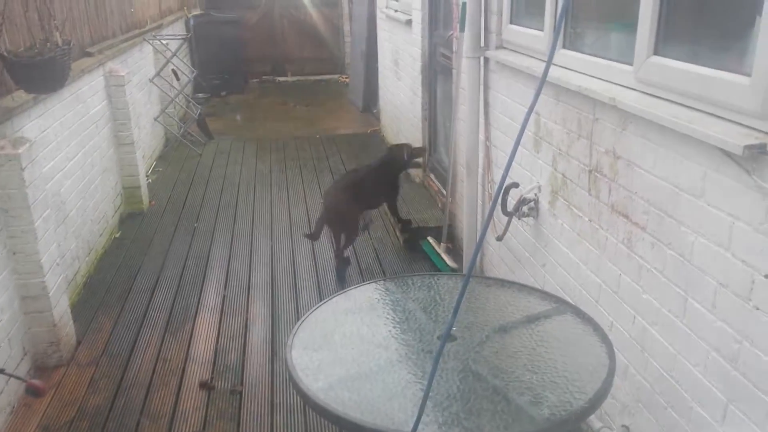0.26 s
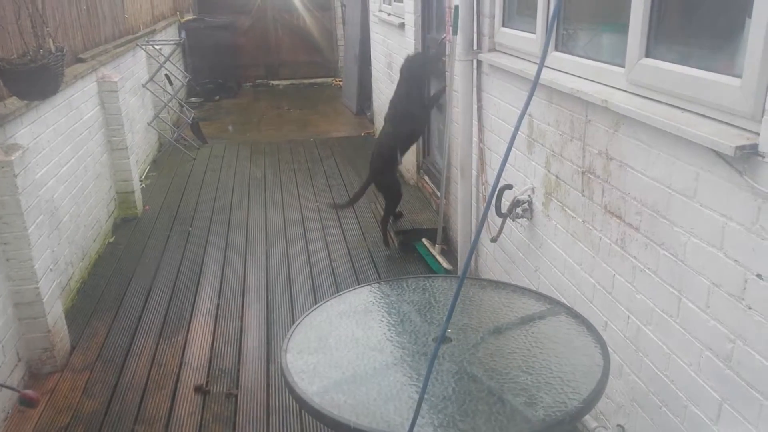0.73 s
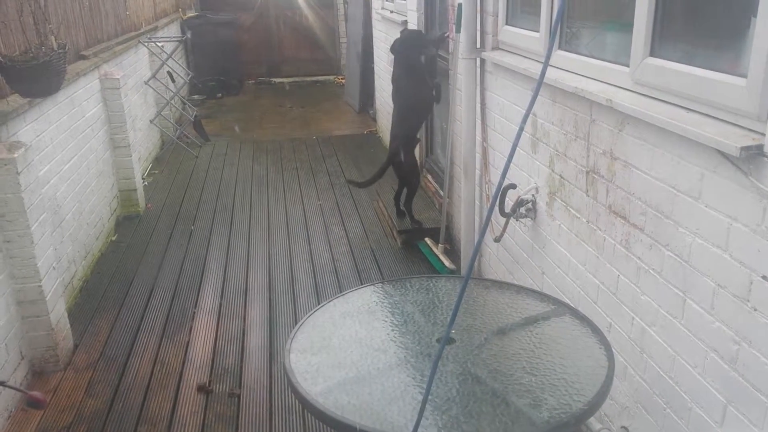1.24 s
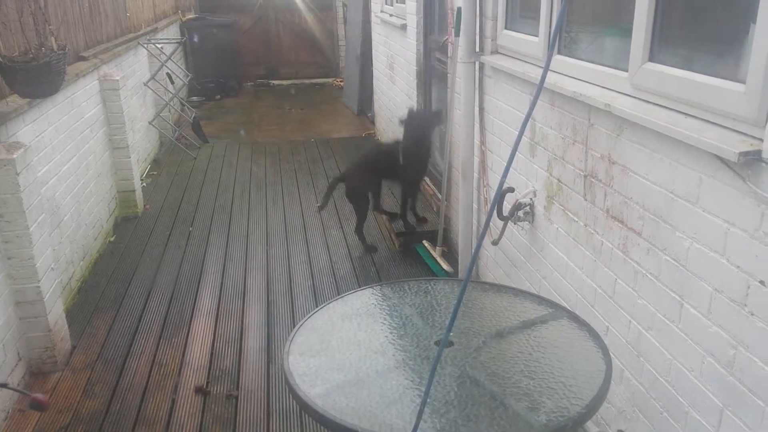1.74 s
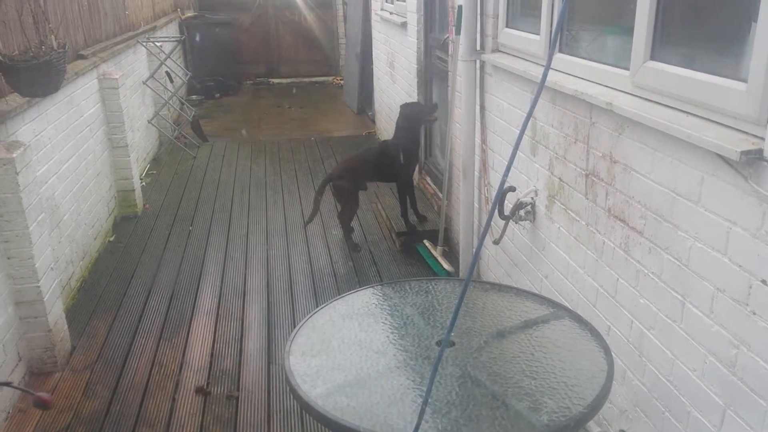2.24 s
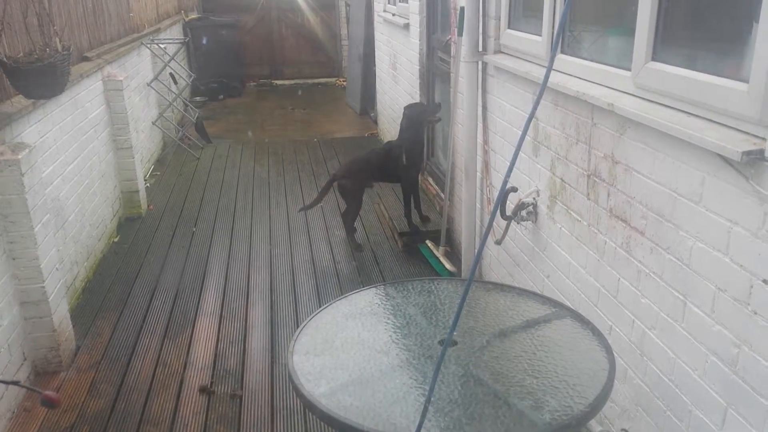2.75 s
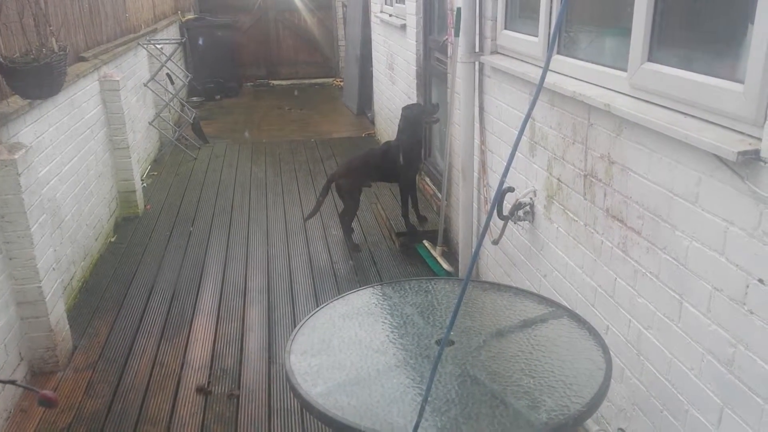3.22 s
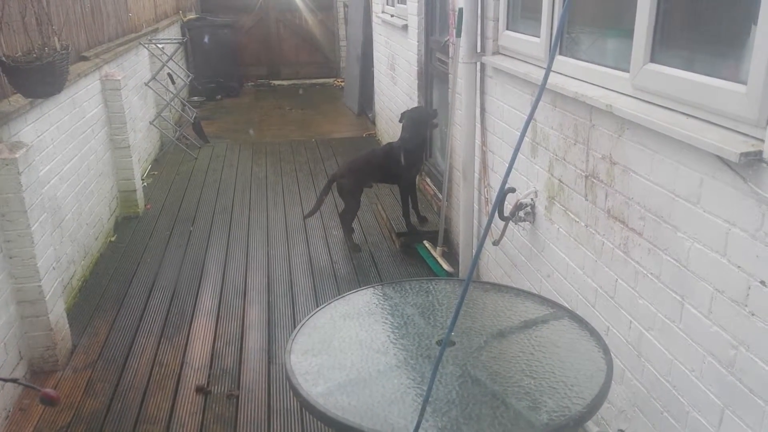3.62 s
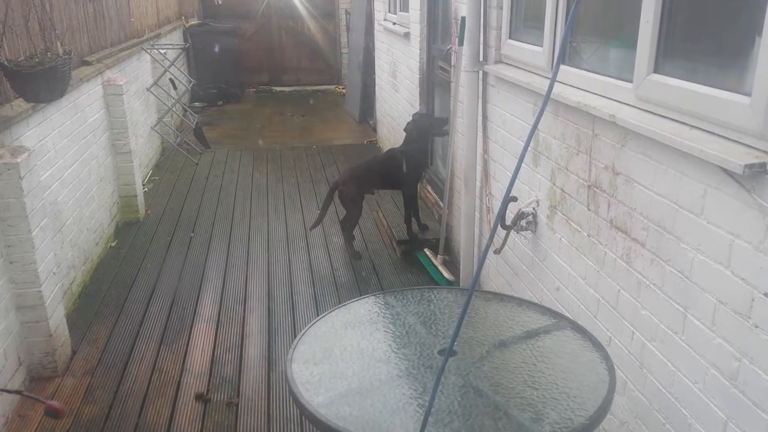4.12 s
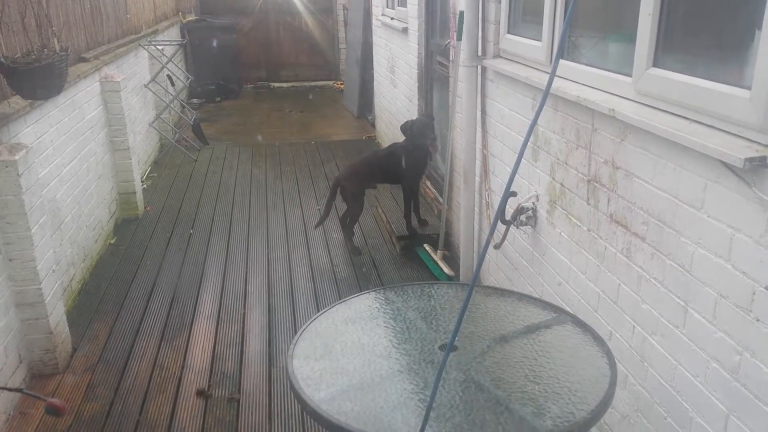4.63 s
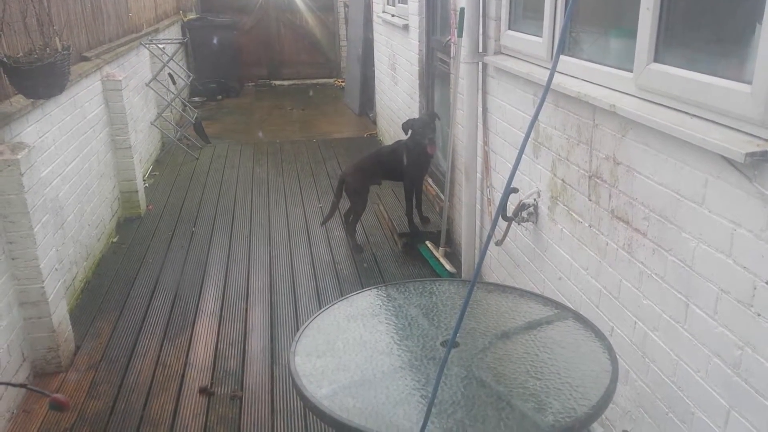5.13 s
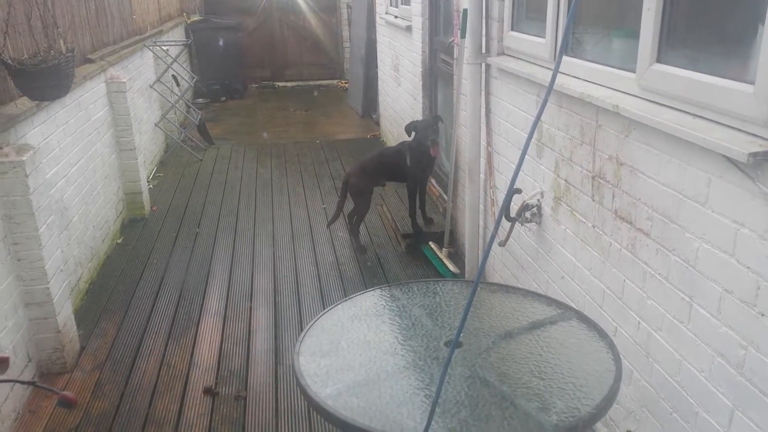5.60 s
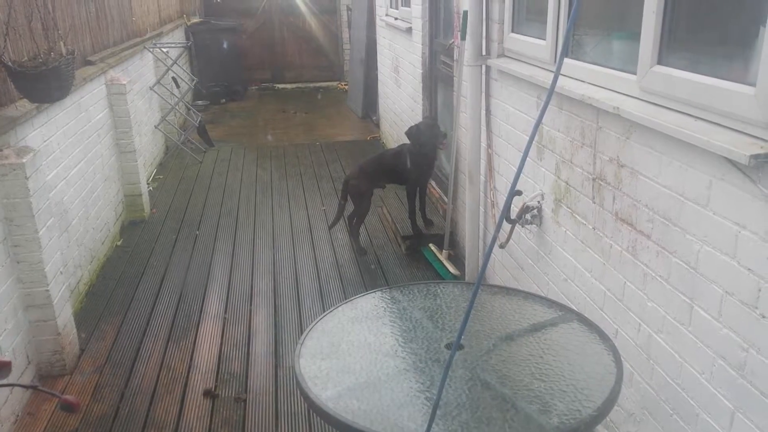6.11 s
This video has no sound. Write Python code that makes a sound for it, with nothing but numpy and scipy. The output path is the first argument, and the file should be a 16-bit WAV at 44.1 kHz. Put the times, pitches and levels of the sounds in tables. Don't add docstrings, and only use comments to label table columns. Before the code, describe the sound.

Sharp claw knocks, short scrapes and paw thuds on wood in a narrow yard, a brief metal dish clank, and a closing collar rattle.

```python
import sys
import numpy as np
from scipy import signal
from scipy.fft import rfft, irfft, next_fast_len
from scipy.io import wavfile
from scipy.ndimage import uniform_filter1d

SR = 44100
rng = np.random.default_rng(int(sys.argv[2]) if len(sys.argv) > 2 else 0)


def volts(x):
    e = np.asarray(x, float) / 20
    return 10 ** e


def put_to_file(sound):
    columns = np.atleast_2d(sound).T
    safe = np.clip(columns, -1, 1)
    whole_steps = np.round(safe * 32767)
    wavfile.write(sys.argv[1], SR, whole_steps.astype(np.int16))


N = 280343


def slips(size, per_s, spread_db):
    chance, sign, height = rng.random((size, 3)).T
    ticks = (chance < per_s / SR) * np.sign(sign - .5)
    return evened(ticks * volts(-spread_db * np.log(height + 0.00022)))


# start in seconds, knock level in dB,
# scrape level in dB over the knock, stroke length in seconds, knock pitch in Hz.
DOOR = [(0.12, -37, -30, 0.034, 503), (0.38, -35, -9.5, 0.027, 1130), (0.479, -26.5, -24, 0.0063, 1130),
        (0.531, -44, -6, 0.035, 1280), (0.788, -35.5, -29, 0.023, 565), (1.156, -28.5, -6, 0.022, 774),
        (1.416, -30.5, -32, 0.05, 850), (1.457, -40.5, -1, 0.03, 630), (1.528, -29, -8.5, 0.0066, 1360),
        (2.066, -50.5, 3, 0.012, 452), (3.469, -42, -16, 0.022, 541), (3.711, -31, -14.5, 0.0086, 1470),
        (4.441, -43, -20, 0.071, 920), (4.769, -35, -18, 0.073, 745), (5.614, -50, 14, 0.0088, 1230),
        (5.772, -29, -27.5, 0.014, 800)]
BOARDS = [(0.001, -55, 3, 0.014, 487), (0.268, -23, -21, 0.015, 710), (0.937, -29.5, -9, 0.0053, 514),
          (1.088, -46, -4.5, 0.039, 624), (1.383, -16.5, -16, 0.012, 705), (2.194, -41.5, 3.5, 0.018, 598),
          (2.215, -41.5, -3, 0.027, 471), (2.418, -25.5, -21, 0.0058, 764), (2.673, -25, -1.5, 0.016, 1600),
          (3.126, -21.5, -16, 0.033, 1240), (3.366, -30.5, -11, 0.0057, 463),
          (3.814, -28.5, -5.5, 0.0089, 506), (3.997, -30.5, -11, 0.016, 1000)]
# start in seconds, knock level in dB,
# scrape level in dB over the knock.
TAPS = [(0.484, -23.5, -28), (1.164, -27.5, 4.5), (1.389, -23, -11), (1.42, -19.5, -14.5),
        (1.455, -23, -20), (2.439, -50, -17), (2.684, -26, -2), (3.136, -24.5, -11.5), (5.621, -43.5, 7),
        (3.71, -30.5, -7.5), (4.011, -37, -30), (5.785, -36.5, -11)]
TAP_S, TAP_HZ = 0.0052, 980
DOOR_TOP_DB, BOARDS_TOP_DB, TAP_TOP_DB = 6.5, -5, -0.5
TAP_AIR_DB = 12


def claws():
    out = np.zeros(N)
    lead_s = .01
    t = np.arange(8192) / SR - lead_s
    strokes = [(*row, DOOR_TOP_DB, 0) for row in DOOR]
    strokes += [(*row, BOARDS_TOP_DB, 0) for row in BOARDS]
    strokes += [(*row, TAP_S, TAP_HZ, TAP_TOP_DB, TAP_AIR_DB) for row in TAPS]
    for s, db, middle_db, length_s, hz, over_db, air_db in strokes:
        u = np.maximum(t, 0) / max(length_s, .002)
        swell = u * np.exp(1 - 2.976 * u)
        stroke = slips(len(t), 7000, 2.0) * swell
        stroke *= np.linalg.norm(swell) / np.linalg.norm(stroke)
        hz = np.clip(hz, 400, 1900)
        top_db = middle_db + over_db
        knock = [(.28 * hz, -24), (.55 * hz, -4), (hz, 0)]
        scrape = [(2100, .5 * middle_db - 0.5), (3000, middle_db - 3), (4600, middle_db - 3.5),
                  (7300, top_db - 0.5), (10500, top_db - 15), (15000, top_db - 30 + air_db)]
        add(out, max(s - lead_s, 0), volts(db + 19.0) * colour(stroke, knock + scrape))
    return out


def ring(hz, db, t60, rise_s=.003, wobble=0.013):
    t = np.arange(SR // 2) / SR
    shake = wobble * np.cumsum(rng.standard_normal(len(t)))
    shift = 1.8 * rng.random((2, 1)) * min(hz / 1500, 1)
    envelope = volts(db - 60 * t / max(t60, .02)) * (1 - np.exp(-t / rise_s))
    return envelope * np.sin(2 * np.pi * hz * t + shake + shift)


# start in seconds, level in dB, pitch in Hz, T60 in seconds.
PANELS = [(0.308, -32.5, 614, 0.31), (0.482, -30, 287.4, 0.095), (0.492, -33.5, 690, 0.089),
          (1.12, -44, 611, 0.97), (1.165, -37, 843, 0.26), (1.172, -37.5, 1333, 0.35),
          (1.40, -31, 523.5, 0.2), (1.42, -33, 978, 0.27), (2.42, -33.5, 351, 0.18),
          (3.716, -63, 1780, 0.22), (3.819, -40, 1260, 0.28), (5.615, -48, 1210, 0.17),
          (5.785, -42, 852, 0.12)]
# start in seconds, level in dB, pitch in Hz.
RINGS = [(0, -54, 9960), (0.399, -47, 6998), (0.539, -49, 6830), (0.54, -55, 11500), (1.165, -35, 8134),
         (1.199, -37, 7800), (1.431, -41, 6869), (1.428, -42.5, 5420), (1.55, -58, 6500), (1.55, -54, 8660),
         (1.905, -51, 2240), (1.93, -52, 3440), (1.905, -52.5, 3300), (2.215, -50, 7340), (3.36, -57, 3060),
         (3.713, -48, 6250), (3.82, -45, 3000), (4.01, -52, 4086), (5.615, -52, 2240), (5.615, -59, 9100),
         (5.615, -60, 10500), (5.615, -56, 12800), (5.615, -59, 11800), (5.615, -56, 14400)]
RING_T60_S = .21


def fittings():
    out = np.zeros((2, N))
    for s, db, hz, t60 in [*PANELS, *[(*row, RING_T60_S) for row in RINGS]]:
        add(out, s, ring(hz, db + 4.5, t60, rise_s=0.0037, wobble=0.069))
    return out


DISH_HZ = [1163, 1773, 2455, 2864, 3326, 3962, 4490, 4673, 5122, 6481, 7590, 7730, 9313]
# level in dB, T60 in seconds.
DISH = [(1, .25), (-3, .7), (5, .15), (2, .15), (-2, .7), (-7, .45), (-7, .45), (-9, .3), (-2.5, .95),
        (-7, .25), (3, .22), (0, .25), (-9, .18)]
DISH_S, DISH_DB = 2.68, -36
DISH_STOP_S = .19


def dish():
    out = np.zeros((2, N))
    t = np.arange(SR // 2) / SR
    stilled = volts(-250 * np.maximum(t - DISH_STOP_S, 0))
    for hz, (db, t60) in zip(DISH_HZ, DISH):
        add(out, DISH_S, stilled * ring(hz, DISH_DB + db, t60, rise_s=.012, wobble=.019))
    return out


# start in seconds, level in dB, pitch in Hz.
THUDS = [
    (0.484, -55, 99.6),
    (2.427, -23, 99.6),
    (3.894, -28, 59.2),
    (4.499, -51, 70.0),
    (4.74, -47, 45.8),
    (4.987, -22.5, 58.6),
    (5.467, -30, 54.3),
]


def thuds():
    out = np.zeros((2, N))
    for s, db, hz in THUDS:
        add(out, s, ring(hz, db, 0.088, rise_s=0.023, wobble=.002))
    return out


# start in seconds, blow in dB into each of the four tags.
CLASHES = [(5.9964, -27.5, -45, -43, -50), (6.014, -25, -21, -27, -43), (6.0394, -27, -45, -44, -29),
           (6.0844, -30, -36, -48, -27.5), (6.1344, -19, -45, -44, -34), (6.144, -18, -36, -35, -26.5),
           (6.1944, -22.5, -37, -36, -43), (6.2194, -23, -53, -24, -37), (6.2494, -29, -54, -21.5, -42),
           (6.2906, -27, -52, -46, -46), (6.3144, -39, -51, -32, -38)]
TAG_HZ = [
    [8081, 14449, 14472, 12634, 12560],
    [4338, 11104, 15330],
    [6190, 6051, 9914],
    [6584, 5697, 7340, 11104],
]
# level in dB, T60 in seconds, left-right difference in dB.
TAGS = [
    [(9, 0.14, 1.5), (-28, 0.36, 3), (-24, 0.33, 2), (-22, 0.2, -14), (-10, 0.16, -1)],
    [(4, 0.24, 3.5), (-8, 0.42, 0), (-32, .2, -3)],
    [(5, 0.17, 8), (-12, 0.27, 17), (-19.5, 0.34, -10)],
    [(-3.5, 0.41, 16), (-3.5, 0.12, 25), (-1, 0.15, 2), (-10, 0.3, -6)],
]


def tags():
    out = np.zeros((2, N))
    s, *blows_db = np.transpose(CLASHES)
    start = round(5.9 * SR)
    t = np.arange(start, N) / SR
    since = np.maximum(t - s[:, None], 0)
    rise = 1 - np.exp(-since / .011)
    for pitches, modes, blow_db in zip(TAG_HZ, TAGS, blows_db):
        for hz, (db, t60, pan_db) in zip(pitches, modes):
            energy = volts(2 * (blow_db[:, None] - 60 * since / t60)) * rise ** 2
            swing = np.cumsum(rng.standard_normal((3, N - start)), axis=1)
            swing = .02 * swing[0] + .012 * swing[1:]
            tone = np.sqrt(energy.sum(0)) * np.sin(2 * np.pi * hz * t + swing)
            out[:, start:] += sides(pan_db) * volts(db) * tone
    return out


# time in seconds, level in dB.
RATTLE = [
    (5.96, -84),
    (5.968, -75),
    (5.994, -37.5),
    (6.022, -42.5),
    (6.066, -43),
    (6.172, -41.5),
    (6.298, -49.5),
    (6.357, -61),
]
# frequency in Hz, level in dB.
RATTLE_COLOUR = [(300, -13), (900, 2), (4500, 1.5), (6200, 7), (8500, 2), (10500, -9), (12600, -8),
                 (12900, -50)]


def chain():
    s, db = np.transpose(RATTLE)
    level_db = np.interp(np.arange(N) / SR, s, db, left=-120)
    return volts(level_db + 11.0) * evened(colour(slips(N, 4000, 2.0), RATTLE_COLOUR))


# frequency in Hz, T60 in seconds.
ECHO = [(300, 0.39), (800, 0.32), (2000, 0.35), (5500, 0.27), (12000, 0.2)]


def walls(x):
    size = SR * 2 // 3
    taps = np.zeros((2, size))
    at = np.arange(60, size - 20, 12) + rng.integers(0, 12, (2, (size - 81) // 12 + 1))
    np.put_along_axis(taps, at, rng.choice([-1., 1.], at.shape), 1)
    hz, t, z = signal.stft(taps, SR, nperseg=256)
    decay = volts(-60 * t / read(ECHO, hz)[:, None])
    tail = signal.istft(z * decay, SR, nperseg=256)[1][:, :size]
    build_up = 1 - np.exp(-np.arange(size) / SR / .011)
    z = rfft(pair(tail * build_up))
    broad = np.sqrt(uniform_filter1d(abs(z) ** 2, size=70, axis=1))
    tail = irfft(z / broad, size)
    return signal.fftconvolve(x, tail / np.linalg.norm(tail[0]), axes=1)[:, :N]


# time in seconds, level in dB over standing still.
STIR = [(0.0, 6.5), (0.1, 2), (0.46, 4), (0.66, 1), (0.89, 1.2), (1.2, 4.5), (1.38, 10.5), (1.56, 2),
        (2.2, 3.5), (2.5, 0.9), (3.4, 1), (4.24, 1.5), (4.45, 8), (4.75, 7.5), (5.12, -1.5), (5.55, -3),
        (5.95, 1.5), (6.36, -2.5)]
# frequency in Hz, level in dB per Hz.
SHUFFLE = [(300, -5.5), (600, -4.5), (1100, -5), (2000, -13.5), (3500, -16.5), (6000, -28)]
# frequency in Hz, level in dB.
RUSTLE = [(2000, -30), (4300, -5.5), (5600, 0.5), (7000, 3), (8500, -1.5), (9500, -10.5), (15500, -35.5)]
SHUFFLE_DB, SHUFFLE_PER_STIR, RUSTLE_DB, RUSTLE_PER_STIR = -54.5, 1.31, -55.5, 0.83


def stirring():
    stir_db = np.interp(np.arange(N) / SR, *np.transpose(STIR))
    flicker = volts(1.2 * evened(uniform_filter1d(rng.standard_normal(N), 1500)))
    shuffle = evened(colour(rng.standard_normal((2, N)), SHUFFLE))
    rustle = evened(colour(rng.standard_normal((2, N)), RUSTLE))
    out = volts(SHUFFLE_DB + SHUFFLE_PER_STIR * stir_db) * flicker * shuffle
    return out + volts(RUSTLE_DB + RUSTLE_PER_STIR * stir_db) * rustle


# time in seconds, level in dB.
TRAFFIC = [(0.0, 1.5), (0.6, 0.5), (1.9, -1), (3.5, -2.5), (4.9, -6), (5.3, -9), (6.36, -6)]
# frequency in Hz, width in Hz, level in dB.
DEEP = [(127.7, 14.8, 7.5), (104, 29, -10)]
UPPER = [(184.4, 44, -2), (267.2, 45, 6.5), (329.6, 57, 0.5), (447, 290, -7), (521, 27, -8.5),
         (577, 14.4, -8.5)]
DEEP_DB, UPPER_DB, DEEP_PER_TRAFFIC = -48.5, -43.5, .7
DRIFT_DB, DRIFT_S = 0.58, 0.073
LORRY_S, LORRY_WIDTH_S, LORRY_DB, LORRY_HZ = 2.145, .33, -38.5, 126


def traffic():
    t = np.arange(N) / SR
    traffic_db = np.interp(t, *np.transpose(TRAFFIC))
    slow = filtered(rng.standard_normal((2, N)), lambda hz: np.exp(-(hz * DRIFT_S) ** 2))
    drift_db = DRIFT_DB * evened(slow)
    deep = hollow(rng.standard_normal((2, N)), DEEP)
    upper = hollow(rng.standard_normal((2, N)), UPPER)
    rumble = volts(DEEP_DB + DEEP_PER_TRAFFIC * traffic_db + drift_db[0]) * deep
    rumble += volts(UPPER_DB + traffic_db + drift_db[1]) * upper
    passing = volts(LORRY_DB) * np.exp(-((t - LORRY_S) / LORRY_WIDTH_S) ** 2)
    throb = 1 + 0.52 * np.sin(2 * np.pi * 9.3 * t)
    drone = passing * throb * np.sin(2 * np.pi * LORRY_HZ * t + 0.43 * drift_db[1])
    return rumble, drone


# frequency in Hz, level in dB.
HUM = [(50, -54.5), (199.5, -53)]


def hum():
    t = np.arange(N) / SR
    return sum(volts(db) * np.sqrt(2) * np.sin(2 * np.pi * hz * t) for hz, db in HUM)


# frequency in Hz, level in dB.
THRUM = [(25, -32), (45, -8), (65, -2), (85, -42), (160, 6), (300, -11)]
# frequency in Hz, level in dB.
HISS = [(1500, -4), (4000, -12), (7000, -5), (10000, -1), (13000, -2), (15500, 2)]
THRUM_DB, HISS_DB = -61.5, -62


def noise_floor():
    thrum = evened(colour(rng.standard_normal((2, N)), [*THRUM, (1000, -69)]))
    hiss = evened(colour(rng.standard_normal((2, N)), HISS))
    return volts(THRUM_DB) * thrum + volts(HISS_DB) * hiss


def yard():
    rumble, drone = traffic()
    return pair(rumble + stirring() + noise_floor()) + hum() + drone


def evened(x):
    return x / np.sqrt(np.mean(x ** 2) + 1e-20)


def read(points, hz):
    f, value = np.transpose(points)
    return np.interp(np.log(hz + 1), np.log(f + 1), value)


def add(mix, s, sound):
    part = mix[..., round(s * SR):][..., :sound.shape[-1]]
    part += sound[..., :part.shape[-1]]


def filtered(x, gain):
    size = next_fast_len(x.shape[-1], True)
    return irfft(rfft(x, size) * gain(np.fft.rfftfreq(size, 1 / SR)), size)[..., :x.shape[-1]]


def colour(x, points):
    return filtered(x, lambda hz: volts(read(points, hz)))


def hollow(x, modes):
    def gain(hz):
        return sum(volts(db) / (1 + (2 * (hz - f) / width) ** 2) for f, width, db in modes)
    return evened(filtered(x, gain))


def sides(db):
    return volts(np.array([[db / 2], [-db / 2]]))


# frequency in Hz, likeness up to 1, where anything below
SAME = [(60, 0.99), (180, 0.98), (550, 0.82), (1650, -0.83), (4970, -0.02), (15000, -0.03)]


def pair(x):
    def same(hz):
        return np.clip(read(SAME, hz), 0, 1)
    shared = filtered(x[0], same)
    own = filtered(x[1], lambda hz: np.sqrt(1 - same(hz) ** 2))
    return np.array([x[0], shared + own])


def scene():
    far = (claws() + chain())[None]
    near = fittings() + dish() + thuds() + tags()
    straight = volts(-13) * far + near
    return straight + walls(far + volts(-14) * near) + yard()


def low_pass(x):
    return signal.sosfilt(signal.butter(12, 15680, fs=SR, output="sos"), x)


# frequency in Hz, left-right difference in dB.
PORTS = [(60, 0.5), (130, 0), (290, 1), (640, 0), (1410, 3.5), (3100, 1), (6820, -7), (15000, -2)]
LAG, EDGE_HZ = 9, 15550


def record(dry):
    hz, db = np.transpose(PORTS)

    def bass_lag(f):
        lag_s = LAG / SR * np.exp(-(f / 1400) ** 2)
        return np.exp(-2j * np.pi * f * lag_s)
    left = colour(dry[0], np.c_[hz, db / 2])
    right = colour(filtered(dry[1], bass_lag), np.c_[hz, -db / 2])
    ports = colour(np.array([left, right]), [(EDGE_HZ - 150, 0), (EDGE_HZ + 100, -60)])
    return low_pass(ports)


dry = scene()
out = record(dry)
put_to_file(out)
```